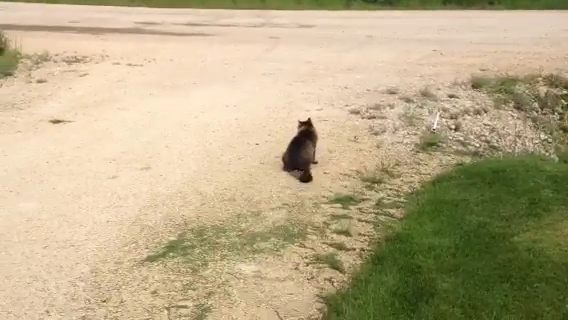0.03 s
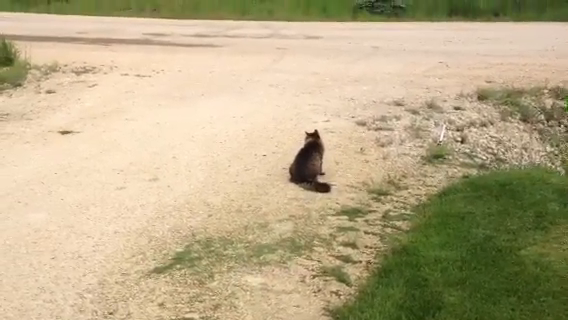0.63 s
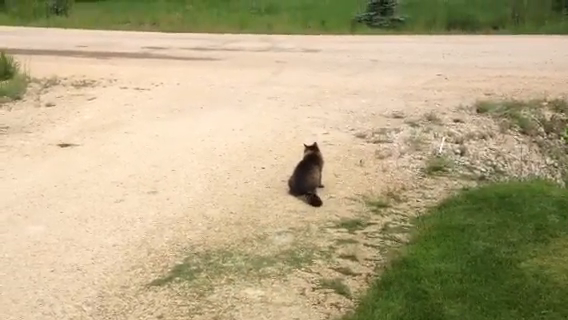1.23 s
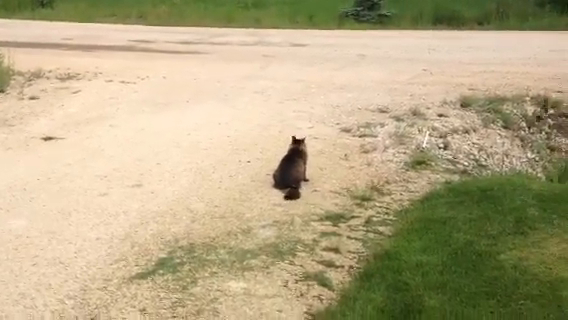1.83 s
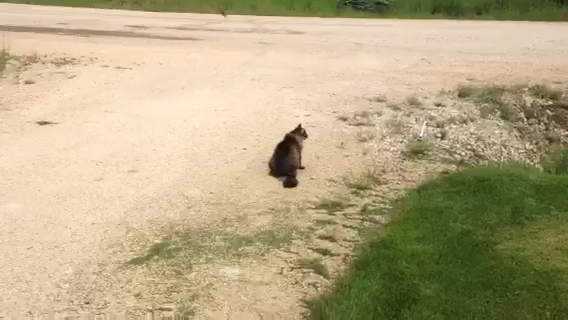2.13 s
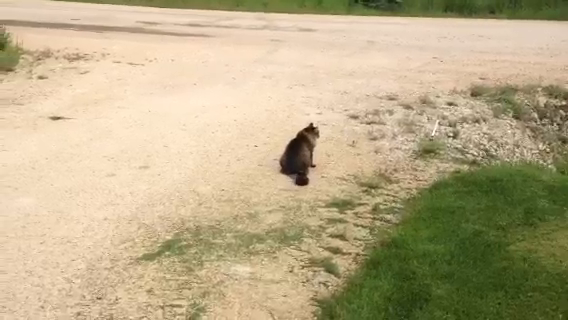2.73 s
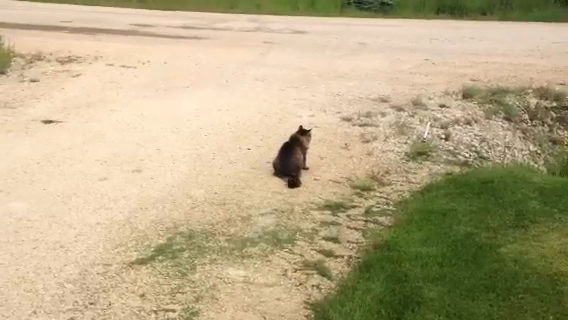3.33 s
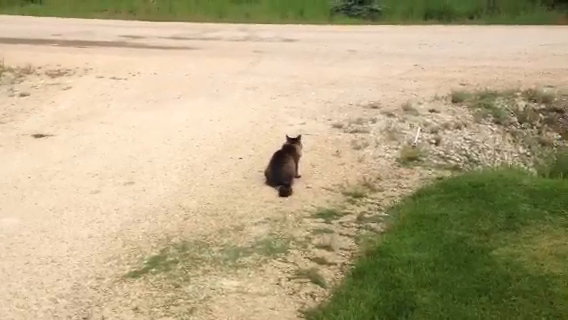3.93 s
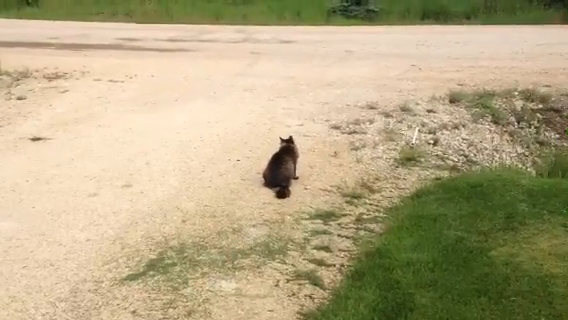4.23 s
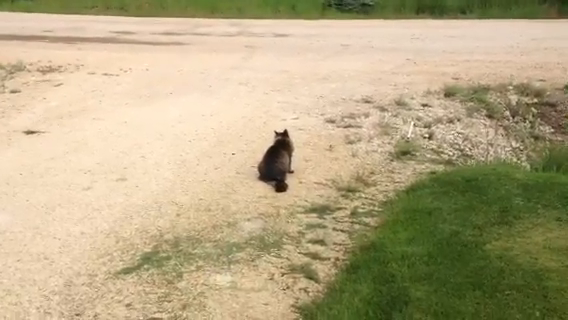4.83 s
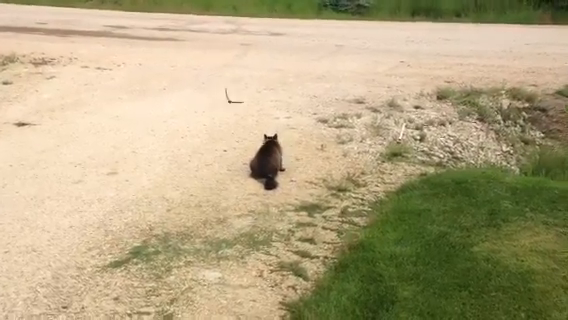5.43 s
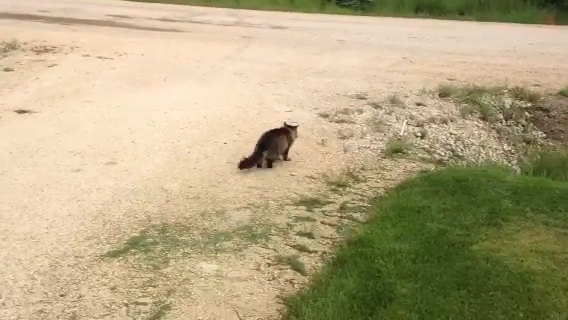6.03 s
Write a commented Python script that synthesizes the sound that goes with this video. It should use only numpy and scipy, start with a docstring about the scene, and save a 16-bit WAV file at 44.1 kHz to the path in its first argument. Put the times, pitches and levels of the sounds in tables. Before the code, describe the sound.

A light breeze hisses softly and steadily outdoors. A faint swallow note sounds at the very start, and a far songbird whistles slow, sliding notes until about 1.5 seconds. Dry leaves rustle faintly around 1.3 seconds. At 2 seconds a swallow snaps its bill with a dry tick and gives two sharp alarm calls, each a cheep followed by a quick zigzag note; a weaker one follows at 3.3. Another bird gives tiny high chips near 1, 2.4, 4.4 and 5.8 seconds. From 2.5 to 5 seconds, distant birds twitter in repeated runs, with peeps, faint hoarse notes and a light echo. Wind buffets the single microphone in low puffs from about 2.5 seconds, strongest between 4.3 and 4.8. At 5.6 seconds comes the loudest, harshest alarm call, with another just after it.

```python
"""On a gravel drive, swallows swoop at a cat and scold it. Each alarm is a cheep sung with both sides
of the voice box at once, a pause and a zigzag note; one bird snaps its bill. Another bird gives sharp
high chips. Farther off, songbirds whistle and twitter in runs of repeated syllables, wrapped in echoes.
Light wind hisses in the trees, rustles briefly and buffets the single microphone in low puffs."""
import sys
import numpy as np
from scipy import signal
from scipy.fft import rfft, irfft, next_fast_len
from scipy.io import wavfile
from scipy.ndimage import uniform_filter1d, map_coordinates

SR = 44100
rng = np.random.default_rng(int(sys.argv[2]) if len(sys.argv) > 2 else 0)


def put_to_file(sound):
    """Save the sound as 16-bit audio at rate SR, in the file named by the first command-line argument."""
    columns = np.atleast_2d(sound).T  # one column per channel
    safe = np.clip(columns, -1, 1)
    whole_steps = np.round(safe * 32767)
    wavfile.write(sys.argv[1], SR, whole_steps.astype(np.int16))


N = 268039


def swallows(cheep_ratio=1.014, zigzag_s=.0725):
    """Each alarm is a cheep, a short pause, then one voice zigzagging up and down."""
    # The alarm calls. Each row: start in seconds, cheep length in seconds, strain from 0 to 1, cheep
    # level in dB, pause in seconds, zigzag level in dB, pitch multiplier, ground echo delay in seconds.
    alarms = [(-.116, 0.07, 0, -48, 0.038, -42.5, 0.94, .002),
              (1.993, 0.083, .8, -33.5, .0285, -26.5, .98, .001),
              (2.247, 0.072, 0.03, -38.5, .03, -35, .955, 0.0011),
              (3.255, 0.08, 0, -50.5, 0.029, -42.5, .98, 0.0059),
              (5.582, .073, 1, -27, .034, -23, 0.99, .002),
              (5.817, .074, 0.1, -33, .03, -29.5, .995, 0.0019)]
    out = np.zeros(N)
    for start, length, strain, cheep_db, pause, zigzag_db, ratio, delay in alarms:
        add(out, start, amp(cheep_db) * cheep(length, strain, cheep_ratio * ratio))
        note = voice(zigzag_shape(), zigzag_s, ratio, overtone_db=-37)
        add(out, start + length + pause, amp(zigzag_db) * ground_echo(note, delay, echo_db=-12))
    return out


def cheep(length, strain, ratio):
    """Two voices sound at once. Strain makes the call harsher and the lower voice later and weaker."""
    # The two voices. Each row: share of the note's length, pitch in Hz, level in dB.
    upper_shape = [(0, 5540, -15), (.1, 6230, -19), (.27, 6200, -11.5), (.42, 6120, -14),
                   (.52, 6480, -20.5), (.77, 6120, 0), (.88, 5600, -2.5), (1, 4830, -22)]
    lower_shape = [(0, 3850, -24), (.2, 4530, -14.5), (.45, 4833, -3.5), (.65, 4786, -7), (.85, 4600, -9.5),
                   (1, 3900, -35)]
    join_share = np.interp(strain, (0, 1), (.3, .5))
    lower_db = np.interp(strain, (0, 1), (7, 3.5))
    harsh_db = np.interp(strain, (0, 1), (-25, -18))
    upper = voice(upper_shape, length, ratio, overtone_db=-40)
    lower_length = length * max(.85 - join_share, .1)
    lower = amp(lower_db) * voice(lower_shape, lower_length, ratio, overtone_db=-39)
    lower = np.pad(lower, (int(join_share * length * SR), len(upper)))[:len(upper)]
    # A third tone sounds at the two pitches added together.
    sum_tone = amp(-0.5) * np.real(signal.hilbert(upper) * signal.hilbert(lower))
    return upper + lower + amp(harsh_db) * (rasp(length) + sum_tone)


def rasp(length, grain_db=4.5):
    """The harsh edge of a forced call: grainy noise, and a creak at half pitch as the voice starts."""
    # The tone colour of the noise. Each row: frequency in Hz, level in dB.
    spectrum = [(1500, -42), (2900, -26), (3800, -3), (5800, 7), (7500, 1.5), (9000, -4), (11200, -2),
                (15000, -18)]
    size = int(length * SR)
    late_swell = np.sin(np.pi * np.linspace(0, 1, size) ** 2) + signal.windows.hann(size) / 2
    hiss = noise(spectrum)[:size] * amp(grain_db * wobble(724, size)) * late_swell
    # Each row: share of the note's length, pitch in Hz, level in dB.
    creak_shape = [(0, 2830, -14), (.12, 2994, -4.5), (.3, 2950, -11), (1, 2910, -42)]
    creak = voice(creak_shape, length, 0.98, overtone_db=-30, jitter=0.016)
    return amp(-2.5) * hiss + amp(-5.5) * creak


def zigzag_shape(count=60):
    """The zigzag flares whenever it sweeps through the pitch at which the throat rings."""
    # A low arch, then a high one. Each row: share of the note's length, pitch in Hz.
    arches = [(0, 3950), (.14, 6050), (.34, 3650), (.49, 6600), (.62, 6750), (.76, 6480), (1, 4150)]
    # How well the throat passes each pitch. Each row: pitch in Hz, level in dB.
    throat = [(3700, -28.5), (4300, -14.5), (5100, -10.5), (5700, -2.5), (6150, -7), (6700, -16.5)]
    share = np.linspace(0, 1, count)
    hz = np.interp(share, *np.transpose(arches))
    return np.transpose([share, hz, along(throat, hz)])


def voice(shape, length, ratio, overtone_db, jitter=0.0072, shimmer_db=6.0):
    """One side of a bird's voice box: a slightly unsteady pure tone with a weak, uneven octave above."""
    size = int(length * SR)
    progress = np.linspace(0, 1, size)
    share, hz, db = np.transpose(shape)
    glide = uniform_filter1d(np.interp(progress, share, hz), size=size // 16)
    pitch = glide * ratio * (1 + jitter * wobble(918, size))
    phase = 2 * np.pi * np.cumsum(pitch) / SR
    level = amp(np.interp(progress, share, db) + wobble(400, size))
    # The octave is strongest where the pitch is pressed highest.
    octave = amp(overtone_db + shimmer_db * wobble(264, size)) * (pitch / pitch.max()) ** 3
    tone = level * np.sin(phase) + octave * np.sin(2 * phase)
    return np.sqrt(2) * tone * signal.windows.tukey(size, .08)


def bill_snap(fade_s=0.0089):
    """A swooping bird snaps its bill: one dry tick that falls by 60 dB in fade_s."""
    # The snap. Each row: start in seconds, level in dB.
    snaps = [(1.9697, -35.5)]
    # Its tone colour. Each row: frequency in Hz, level in dB.
    spectrum = [(600, -37), (1800, -2), (3000, 7), (4500, -6), (6500, 0), (9000, -19), (15000, -19)]
    out = np.zeros(N)
    t = np.arange(SR // 50) / SR
    for start, db in snaps:
        add(out, start, noise(spectrum)[:len(t)] * amp(db - 60 * t / fade_s))
    return out


def chips(length=.0175):
    """Another bird's very short high notes dive and flick up again."""
    # One chip. Each row: share of the note's length, pitch in Hz, level in dB.
    shape = [(0, 11800, -6), (.2, 10400, -28), (.42, 7800, -0.5), (.58, 7300, -5), (.72, 7410, 5),
             (.85, 8930, -15), (1, 11400, -12)]
    # The calls. Each row: start in seconds, pitch multiplier, level in dB.
    calls = [(.138, 0.9, -60), (1.015, 0.95, -39), (2.383, 1, -40), (3.52, 1.05, -57), (3.695, 1.06, -59),
             (4.3843, 1.02, -37), (5.211, 1.06, -56.5), (5.848, 1.04, -39.5)]
    out = np.zeros(N)
    for start, ratio, db in calls:
        note = voice(shape, length, ratio, overtone_db=-23, jitter=0.014)
        add(out, start, amp(db) * ground_echo(note, delay=.003, echo_db=-5))
    return out


def twitter():
    """A far bird sings one quick song in four runs, each repeating a single syllable."""
    # The syllables. Each row: start within the syllable and length in seconds,
    # first and last pitch in Hz, level in dB.
    dive = [(0, 0.026, 4230, 2600, 0)]
    cascade = [(0, 0.03, 5600, 4290, -6.5), (.045, 0.0136, 3600, 4184, -4), (.061, .016, 4250, 3170, 1)]
    roll = [(0, 0.0244, 3130, 3640, 0), (.04, 0.0185, 4000, 4390, -5), (.08, .026, 4900, 3500, -2),
            (.112, 0.036, 4270, 3010, -11)]
    notes = (repeated(dive, start_s=2.524, period_s=0.09, level_db=-59, swell_db=0, count=2)
             + repeated(cascade, start_s=2.717, period_s=.114, level_db=-49.5, swell_db=-0.5, count=3)
             + repeated(roll, start_s=3.094, period_s=.164, level_db=-49.5, swell_db=-1.5, count=5)
             + repeated(dive, start_s=3.82, period_s=.11, level_db=-55.0, swell_db=.5, count=6))
    return far_notes(notes, jitter=0.015, flutter_db=2)


def peeps():
    """Single rising peeps come from farther off."""
    # Each row: start and length in seconds, first and last pitch in Hz, level in dB.
    notes = [(3.833, .072, 7100, 7700, -59), (3.945, .051, 6050, 7100, -53.5),
             (4.05, 0.038, 5600, 6220, -54), (4.186, .013, 4600, 6270, -53),
             (5.09, 0.0126, 5170, 6290, -50.5), (5.809, 0.011, 3860, 4200, -37)]
    return far_notes(notes, jitter=0.0091, flutter_db=3.0)


def whistles():
    """A far songbird whistles slow, sliding notes."""
    # Each row: start and length in seconds, first and last pitch in Hz, level in dB.
    notes = [(.095, 0.086, 2340, 2217, -55), (.215, 0.05, 2190, 2460, -58), (.31, 0.053, 2605, 2310, -57.5),
             (.45, 0.022, 3320, 3200, -62), (.575, 0.17, 2570, 2847, -60.5), (.79, 0.039, 3070, 2720, -57),
             (.9, .17, 3100, 3135, -62), (1.24, 0.13, 2900, 3030, -59), (1.33, .067, 3290, 3180, -61),
             (1.46, 0.088, 3050, 2720, -61.5), (4.1, .06, 2000, 2086, -54.5)]
    return far_notes(notes, jitter=0.021, flutter_db=1.0)


def buzzes():
    """Another far bird repeats a hoarse note at an even pace."""
    # Each row: start within the syllable and length in seconds, first and last pitch in Hz, level in dB.
    syllable = [(0.00074, .15, 3870, 3690, 0)]
    notes = repeated(syllable, start_s=4.145, period_s=.214, level_db=-62, swell_db=-.2, count=4)
    return far_notes(notes, jitter=0.03, flutter_db=2)


def chatter(count=70, centre_hz=4100, octaves=0.45):
    """The rest of the flock: faint overlapping notes at random times and pitches."""
    # How loud the flock is. Each row: time in seconds, note level in dB.
    loudness = [(0, -95), (2, -66), (2.5, -58.5), (4.2, -61), (5, -84)]
    when, span, height, slope = rng.random((count, 4)).T
    start = when * (N / SR - .05)
    length = 0.0173 + 0.0296 * span
    from_hz = centre_hz * 2 ** (octaves * (2 * height - 1))
    to_hz = from_hz * (.72 + .42 * slope)
    db = np.interp(start, *np.transpose(loudness))
    return far_notes(zip(start, length, from_hz, to_hz, db), jitter=0.033, flutter_db=3.5)


def far_notes(notes, jitter, flutter_db):
    """Pure tones that each slide along half an arch: flat at the top and steep at the bottom."""
    out = np.zeros(N)
    for start, length, from_hz, to_hz, db in notes:
        size = int(length * SR)
        progress = np.linspace(0, 1, size)
        bend = progress ** 2 if to_hz < from_hz else 1 - (1 - progress) ** 3
        pitch = (from_hz + (to_hz - from_hz) * bend) * (1 + jitter * wobble(403, size))
        level = amp(db + flutter_db * wobble(167, size)) * signal.windows.tukey(size, .5)
        add(out, start, level * np.sin(2 * np.pi * np.cumsum(pitch) / SR))
    return out


def repeated(syllable, start_s, period_s, level_db, swell_db, count):
    """List the notes of a syllable repeated evenly, its level changing by swell_db each time."""
    return [(start_s + k * period_s + offset, length, from_hz, to_hz, level_db + k * swell_db + db)
            for k in range(count) for offset, length, from_hz, to_hz, db in syllable]


def buffeting(cycles=0.83, lumps_db=4.0, sway_db=2.0, knock_db=-17, low_cut_hz=73):
    """Swirls of air hit the microphone: a lumpy rumble and single puffs, each with a short knock."""
    # The wind's strength. Each row: time in seconds, level in dB.
    strength = [(0.01, -66.5), (2.12, -65), (2.17, -74), (2.48, -71), (2.56, -50.5), (3.02, -54),
                (3.08, -57), (3.27, -48.5), (3.56, -53.5), (3.62, -70), (3.73, -43.5), (3.81, -70),
                (3.96, -49), (4.66, -40), (4.75, -46), (4.83, -42), (4.89, -52), (5.22, -60), (5.28, -49.5),
                (5.41, -46.5), (5.66, -62.5), (5.71, -45.5), (5.93, -61.5), (6.07, -56)]
    # The rumble's tone colour. Each row: frequency in Hz, level in dB.
    spectrum = [(15, -68), (25, -34), (38, -23), (107, -1), (135, 2.5), (194, -1), (301, -16), (357, -25.5),
                (472, -33), (600, -53), (780, -65), (1320, -120)]
    # The strongest puffs. Each row: time of the peak in seconds, level in dB, pitch in Hz.
    puffs = [(.857, -37, 195), (2.761, -36.5, 193), (2.855, -31.5, 197), (3.5, -33, 175), (4.171, -34, 175),
             (4.382, -29, 160), (4.483, -26.5, 152), (4.555, -31, 140), (4.621, -25, 174),
             (4.651, -26.5, 144), (4.816, -32, 194)]
    swirls = amp(lumps_db * wobble(35, N) + sway_db * wobble(8.9, N))
    out = amp(curve(strength)) * unit(noise(spectrum) * swirls)
    t = np.arange(-SR // 25, SR // 25) / SR
    for peak_s, db, hz in puffs:
        swell = 1 / np.cosh(2 * t * hz / cycles)
        phase = 2 * np.pi * hz * t + rng.uniform(-0.9, 1)
        puff = np.cos(phase) + amp(knock_db) * np.sin(2 * phase)
        add(out, peak_s + t[0], amp(db) * swell * puff)
    # The microphone passes no deep bass.
    return signal.sosfilt(signal.butter(3, low_cut_hz, "high", fs=SR, output="sos"), out)


def rustle(grain_db=3.5):
    """Dry leaves nearby give one faint, brief, grainy rustle."""
    # Its rise and fall. Each row: time in seconds, level in dB.
    loudness = [(1.15, -99), (1.22, -57), (1.3, -59), (1.39, -65), (1.45, -64), (1.54, -62), (1.62, -90)]
    # Its tone colour. Each row: frequency in Hz, level in dB.
    spectrum = [(600, -5), (1500, 1), (5000, 2), (8500, -1.5), (11000, -9), (15000, -20)]
    return amp(curve(loudness)) * unit(noise(spectrum) * amp(grain_db * wobble(250, N)))


def breeze(level_db=-55.5, sway_db=0.73):
    """Open air, a far road and leaves blend into a steady hiss that sways a little."""
    # Its tone colour. Each row: frequency in Hz, level in dB.
    spectrum = [(25, -27), (70, 1.5), (140, 5.5), (300, -1), (600, -0.5), (1200, -2), (2100, 0),
                (3000, -1.5), (3700, -4.5), (4600, 2), (5400, -2.5), (8200, -5), (9600, -14.5),
                (15000, -16)]
    return amp(level_db + sway_db * wobble(4.45, N)) * noise(spectrum)


def ground_echo(call, delay, echo_db):
    """A call plus its slightly later copy off the ground; fast sweeps beat against the copy."""
    lag = max(int(delay * SR), 1)
    direct = np.pad(call, (0, lag))
    echo = amp(echo_db) * np.pad(call, (lag, 0))
    return (direct + echo) / np.hypot(1, amp(echo_db))


def yard_echoes(calls, gap_s=.004):
    """Gravel, trees and walls scatter the calls; the echo lasts longest near 5000 Hz."""
    # How long the yard rings. Each row: frequency in Hz, seconds to fade by 60 dB.
    fade_times = [(2000, 0.11), (5000, 1), (8000, 0.65), (14000, 0.087)]
    hz, t, bands = signal.stft(rng.standard_normal(SR // 2), SR, nperseg=256)
    fade = amp(-60 * t / along(fade_times, hz)[:, None])
    tail = signal.istft(bands * fade, SR, nperseg=256)[1]
    t = np.arange(len(tail)) / SR
    early_boost = 1 + amp(8.5 - 60 * t / 0.078)  # near surfaces answer first and strongest
    tail = tail * early_boost * (t > gap_s)
    return signal.fftconvolve(calls, tail / np.linalg.norm(tail))[:N]


def amp(db):
    """Turn decibels into a multiplier."""
    return 10 ** (np.asarray(db) / 20)


def unit(x):
    """Scale a sound to an average (rms) level of 1."""
    return x / np.sqrt(np.mean(x ** 2) + 1e-20)


def along(points, hz):
    """Read between rows of frequency and value, with octaves evenly spaced."""
    frequencies, values = np.transpose(points)
    return np.interp(np.log(hz + 1), np.log(frequencies + 1), values)


def curve(rows):
    """Turn rows of seconds and value into one value per sample."""
    return np.interp(np.arange(N) / SR, *np.transpose(rows))


def wobble(rate, size, count=8192):
    """A smooth curve through `rate` random values a second."""
    return map_coordinates(rng.standard_normal(count), [np.arange(size) * rate / SR], mode="mirror")


def filtered(x, response):
    """Multiply each frequency in a sound by response(hz)."""
    size = next_fast_len(N + SR // 2)
    return irfft(rfft(x, size) * response(np.fft.rfftfreq(size, 1 / SR)), size)[:N]


def noise(spectrum):
    """Noise with the given tone colour, at an average level of 1."""
    return unit(filtered(rng.standard_normal(N), lambda hz: amp(along(spectrum, hz))))


def add(track, start_s, sound):
    """Mix a sound into the track at the given time."""
    start = round(start_s * SR)
    sound = sound[max(-start, 0):N - start]
    track[max(start, 0):][:len(sound)] += sound


def scene():
    """Birds and wind, the same in both channels. Near birds have little echo, far ones much more."""
    near = swallows() + bill_snap()
    high = chips()
    flock = twitter() + peeps() + chatter()
    song = whistles() + buzzes()
    echoes = yard_echoes(amp(-18) * near + amp(-9) * high + amp(-3) * flock + amp(-2) * song)
    mono = near + high + flock + song + echoes + buffeting() + breeze() + rustle()
    return np.array([mono, mono])


def record(dry, top_hz=15400):
    """Cut away the very highest treble."""
    return np.array([filtered(channel, lambda hz: hz < top_hz) for channel in dry])


dry = scene()
out = record(dry)
put_to_file(out)
```